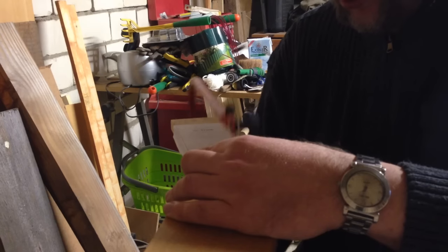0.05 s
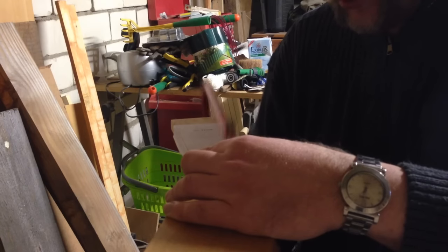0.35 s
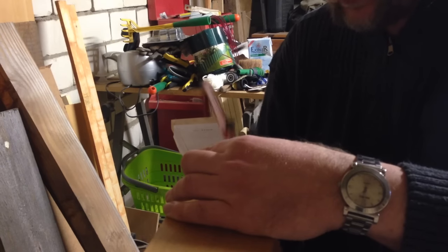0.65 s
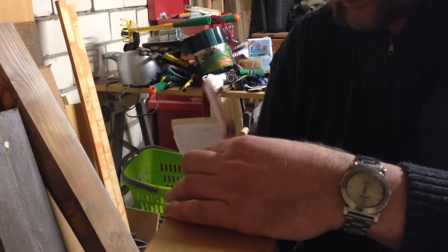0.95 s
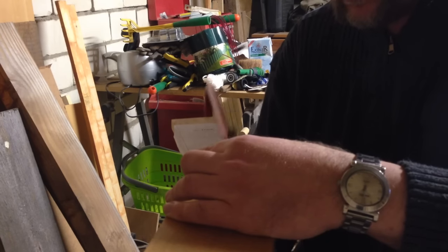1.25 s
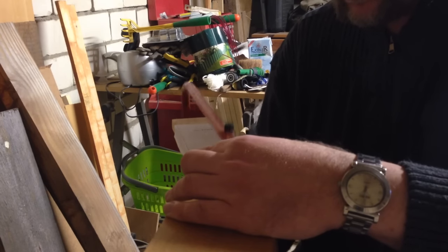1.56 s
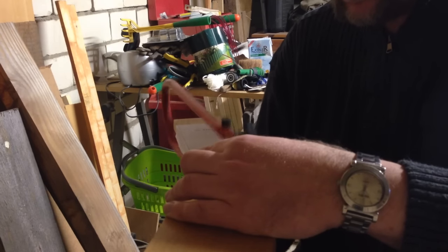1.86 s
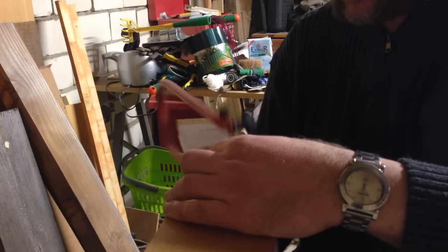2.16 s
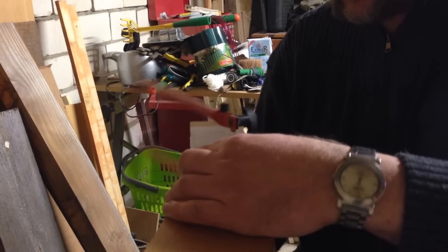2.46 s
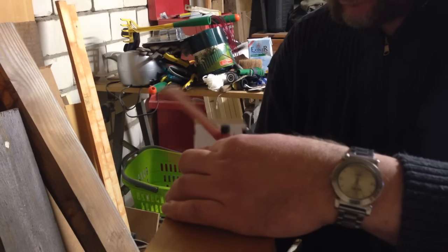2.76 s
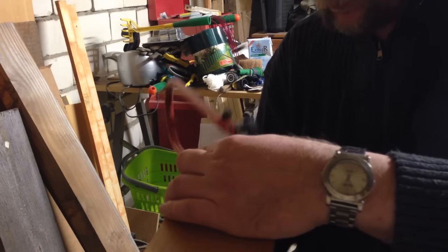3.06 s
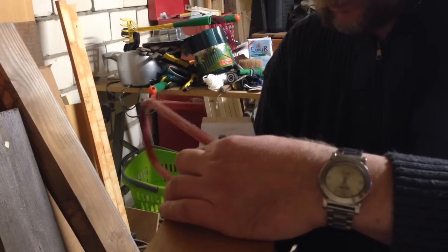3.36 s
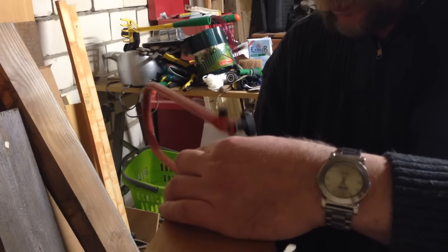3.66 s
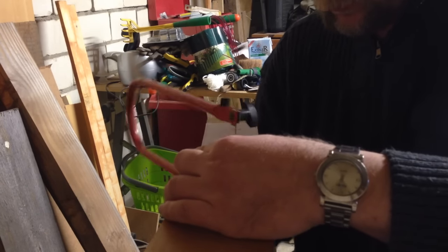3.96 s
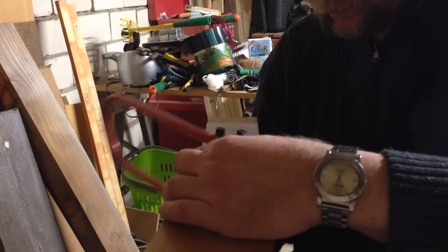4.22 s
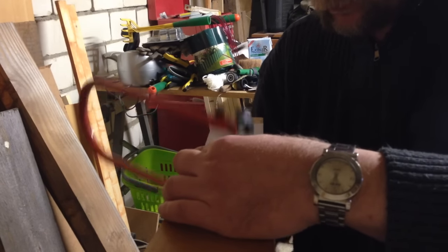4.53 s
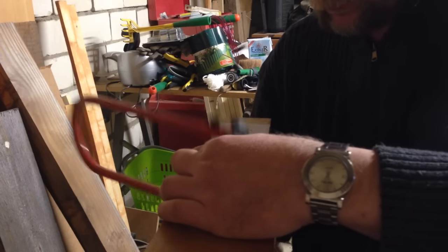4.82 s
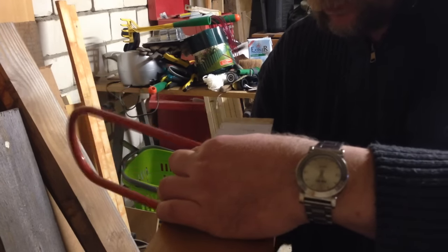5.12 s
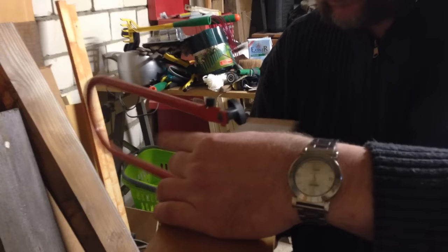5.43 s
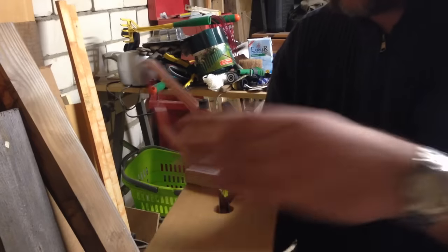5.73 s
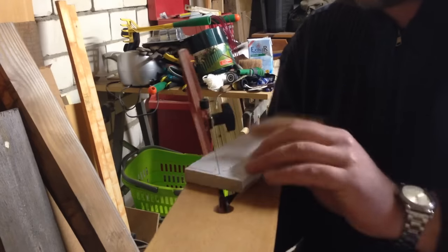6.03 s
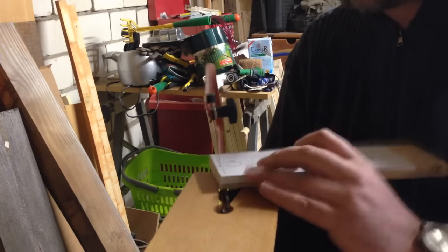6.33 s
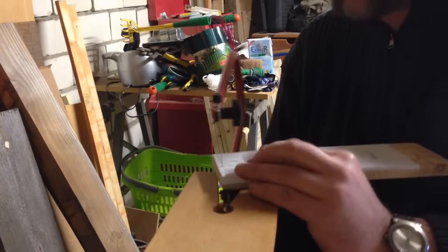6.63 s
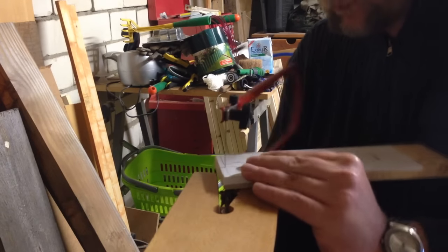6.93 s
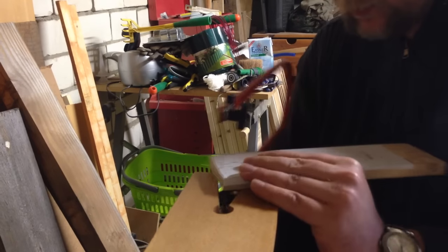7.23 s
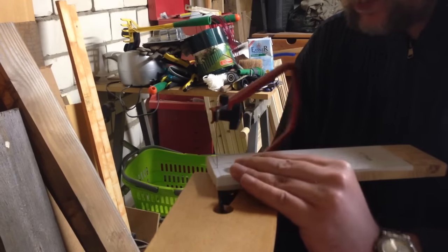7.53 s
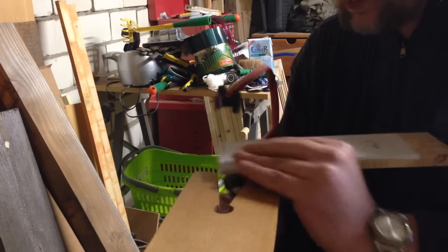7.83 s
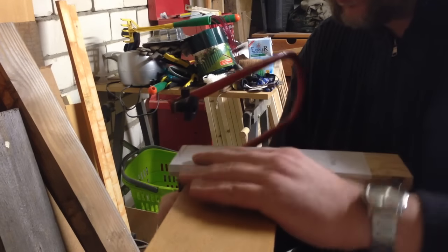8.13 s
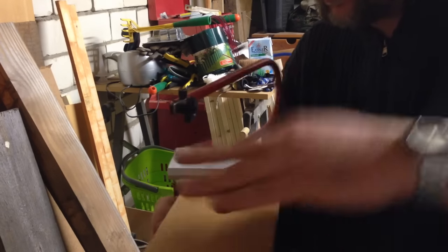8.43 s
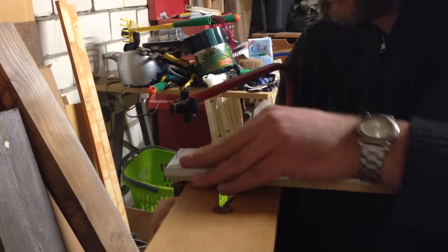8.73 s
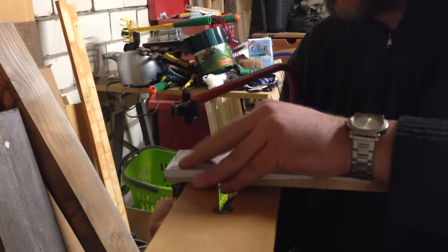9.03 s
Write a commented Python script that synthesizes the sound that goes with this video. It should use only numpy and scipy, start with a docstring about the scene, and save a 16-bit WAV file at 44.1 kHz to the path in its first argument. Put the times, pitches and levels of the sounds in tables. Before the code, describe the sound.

A hand fretsaw rasps quickly through a thin board, breaks through with a sharp crack, then the wood is knocked and slid about.

```python
"""Fretsaw cutting a thin board.

A hand fretsaw works on a sawing table in a small workshop; its teeth tear fibres and the board resonates.
Loud cutting strokes alternate with softer returns; now and then the blade snags and jolts the board.
The saw breaks through with a sharp knock; the board is lifted, set down and slid to a new position."""
import sys
import numpy as np
from scipy import signal
from scipy.fft import rfft, irfft, next_fast_len
from scipy.io import wavfile

SR = 44100
rng = np.random.default_rng(int(sys.argv[2]) if len(sys.argv) > 2 else 0)


def wav_out(sig):
    """Save sig, one row per channel (or a flat mono array), as 16-bit PCM at SR to the path in sys.argv[1]."""
    wavfile.write(sys.argv[1], SR, np.round(np.clip(np.atleast_2d(sig).T, -1, 1) * 32767).astype(np.int16))


N = 409233
TIME = np.arange(N) / SR
TABLE_HZ = 165   # lowest mode of the sawing table


def from_db(db):
    """Decibels to gain."""
    return 10 ** (np.asarray(db) / 20)


def unit_rms(x):
    """Scale to unit rms."""
    return x / np.sqrt(np.mean(x ** 2) + 1e-20)


def at_hz(points, hz):
    """Read a table on a log-frequency axis."""
    f, value = np.transpose(points)
    return np.interp(np.log(np.maximum(hz, 1)), np.log(f), value)


def at_time(curve, s):
    """Read every column of a curve at time s."""
    times, *columns = np.transpose(curve)
    return [np.interp(s, times, column) for column in columns]


def drift(rate_hz):
    """Smooth random curve, unit rms."""
    knots = rng.standard_normal(8000)
    return unit_rms(np.interp(TIME * rate_hz, np.arange(len(knots)), knots))


def body(colour, resonances=(), size=8192):
    """Minimum-phase response, peak 1; resonances: (centre [Hz], width [Hz], boost [dB])."""
    hz = np.fft.rfftfreq(size, 1 / SR)
    db = at_hz(colour, hz)
    for centre_hz, width_hz, boost_db in resonances:
        db = db + boost_db / (1 + (2 * (hz - centre_hz) / width_hz) ** 2)
    cepstrum = irfft(np.log(from_db(db)))
    cepstrum[1:size // 2] *= 2
    cepstrum[size // 2 + 1:] = 0
    response = irfft(np.exp(rfft(cepstrum)))[:size // 2]
    return response / np.abs(response).max()


def through(force, response):
    """Pass a force through an impulse response."""
    return signal.oaconvolve(force, response)[:N]


def grains(per_s, spread_db):
    """Fibres tear or catch at random moments, with uneven strength."""
    sizes = from_db(spread_db * np.minimum(rng.exponential(1, N), 4.5))
    return (rng.random(N) < per_s / SR) * sizes * rng.choice([-1, 1], N)


def blows(times, levels_db, scatter=0, scatter_s=0.003):
    """One impulse per contact, plus random echoes from the edges of the wood."""
    force = np.zeros(N + SR)
    t = TIME[:SR // 30]
    for s, db in zip(times, levels_db):
        echoes = rng.standard_normal(len(t)) * np.exp(-t / scatter_s)
        pulse = scatter * echoes / np.sqrt(np.sum(echoes ** 2))
        pulse[0] += 1
        at = round(s * SR)
        force[at:at + len(t)] += from_db(db) * pulse
    return force[:N]


def contact(s, db, response, scatter, scatter_s):
    """A single contact on a spot with this response."""
    at = round(s * SR)
    force = blows([s], [db], scatter, scatter_s)[at:at + SR // 30]
    return np.pad(signal.fftconvolve(force, response), (at, N))[:N]


def bending(x, delay_at_1khz_s):
    """Dispersive bending waves in the board: lows arrive after highs."""
    size = next_fast_len(N + SR // 2)
    hz = np.fft.rfftfreq(size, 1 / SR)
    lag_cycles = 2 * delay_at_1khz_s * np.sqrt(1000 * hz)
    return irfft(rfft(x, size) * np.exp(-2j * np.pi * lag_cycles), size)[:N]


# workshop background: (frequency [Hz], level [dB])
AIR_COLOUR = [(20, -29), (40, 4), (55, -3.5), (90, -7), (130, -8), (185, 6.5), (245, -9.5), (310, -2.5),
              (600, -14.5), (850, -18), (2500, -16), (3200, -15), (5300, -16), (15000, -19)]


def air(level_db=-61.5):
    """Steady, low background noise."""
    return from_db(level_db) * unit_rms(through(rng.standard_normal(N), body(AIR_COLOUR)))


# reflection strength: (frequency [Hz], level [dB])
ROOM_COLOUR = [(150, 6), (700, 3), (1400, -1), (2600, -18.5), (6000, 2)]
# reverberation: (frequency [Hz], t60 [s])
ROOM_T60 = [(100, 0.22), (300, 0.18), (1000, .25), (2500, 0.21), (6000, 0.14), (14000, .12)]


def room_response(build_s=0.0026):
    """Diffuse reflections of a cluttered room: fast build-up, treble dies first; unit energy."""
    t = TIME[:SR // 2]
    edges_hz = np.geomspace(45, 17000, 10)
    tail = 0
    for low, high in zip(edges_hz, edges_hz[1:]):
        bandpass = signal.butter(2, [low, high], "band", fs=SR, output="sos")
        band = signal.sosfilt(bandpass, rng.standard_normal(len(t)))
        hz = np.sqrt(low * high)
        tail += band * from_db(at_hz(ROOM_COLOUR, hz) - 60 * t / at_hz(ROOM_T60, hz))
    tail *= (1 - np.exp(-t / build_s)) ** 2
    return tail / np.sqrt(np.sum(tail ** 2))


# hand and board sliding on the table: (time [s], hum [dB], rub [dB])
SLIDE = [(5.6, -82, -57.5), (6.21, -72, -78), (6.48, -52, -59), (6.64, -57, -65), (6.92, -64.5, -72.5),
         (7.93, -69.5, -58.5), (8.2, -57, -72), (8.5, -65.5, -67.5), (9.28, -72, -71)]
# short rubs: a brief scrape of the returning blade at 2.43 s, then rubs of hand, sleeve and board: (middle [s],
# length [s], level [dB])
RUBS = [(2.428, .06, -57), (5.828, 0.12, -60.5), (5.923, 0.12, -56), (6.235, 0.22, -58.5),
        (6.592, 0.048, -57.5), (6.878, 0.11, -60.5), (7.401, 0.16, -57), (7.552, 0.23, -60.5),
        (7.887, 0.13, -56), (8.08, .17, -55.5), (8.202, 0.13, -51.5), (8.365, 0.5, -60), (8.54, 0.056, -56),
        (8.77, 0.21, -60), (9.028, 0.14, -60.5)]
# friction spectrum: (frequency [Hz], level [dB])
RUB_COLOUR = [(200, -30.5), (400, -4.5), (900, -8), (1500, -4), (2500, -3), (4000, -10), (5400, -11),
              (8000, -22.5), (15000, -19.5)]


def sliding(hum_gain_db=-1, rub_gain_db=-4, resting_hum_db=-74, resting_rub_db=-78):
    """Friction of hand and board rustles and keeps the table's lowest mode humming."""
    times, hum_db, rub_db = np.transpose(SLIDE)
    hum_colour = [(40, -27), (120, -10.5), (175, -9), (240, -7), (330, -22), (700, -32), (3000, -64.5)]
    hum = unit_rms(through(grains(900, 7.5), body(hum_colour, [(TABLE_HZ, 24, 17)])))
    hum *= from_db(np.interp(TIME, times, hum_db + hum_gain_db, left=resting_hum_db))
    friction = grains(3000, 3.6) * from_db(2 * drift(50))
    rub = unit_rms(through(friction, body(RUB_COLOUR)))
    pressure = from_db(np.interp(TIME, times, rub_db + rub_gain_db, left=resting_rub_db))
    for middle_s, length_s, db in RUBS:
        arch = np.cos(np.pi * np.clip((TIME - middle_s) / length_s, -0.5, 0.5))
        pressure = np.maximum(pressure, from_db(db) * arch)
    return hum + rub * pressure


# swish spectrum: (frequency [Hz], level [dB])
SWISH_COLOUR = [(500, -5.5), (2000, 4), (4000, 0.5), (5500, 6.5), (9000, -4), (15000, -6)]


def swish(peak_s=7.165, level_db=-46, rise_db_per_s=1700, fall_db_per_s=272):
    """A bright swish that rises fast and dies away."""
    t = TIME - peak_s
    envelope_db = level_db + np.minimum(rise_db_per_s * t, -fall_db_per_s * t)
    hiss = unit_rms(through(grains(11000, 2.1), body(SWISH_COLOUR)))
    return from_db(np.maximum(envelope_db, -200)) * hiss


# one brief rub, two saw frame taps: (time [s], level [dB], ring [Hz])
LIGHT_CONTACTS = [(8.535, -41, 1300), (8.875, -33.5, 3180), (9.264, -32.5, 5400)]
# their spectrum: (frequency [Hz], level [dB])
LIGHT_COLOUR = [(200, -15), (700, -7), (1300, -5), (1850, 0), (2500, -7.5), (3300, -4.5), (4400, -15),
                (5400, -9), (7000, -17.5), (14000, -30)]


def light_contacts():
    """A brief rub near 1.3 kHz, then two light taps of the saw frame."""
    return sum(contact(s, db, body(LIGHT_COLOUR, [(hz, 0.27 * hz, 11)]), scatter=3.54, scatter_s=0.018)
               for s, db, hz in LIGHT_CONTACTS)


# sawing table modes: (frequency [Hz], level [dB], t60 [s])
TABLE_MODES = [(178, 1.5, 0.17), (306, -1, 0.39), (590, -5, 0.34), (900, -12, .24), (1004, -3, 0.39),
               (1160, 7, .3), (1297, 7, 0.18), (1536, 12, 0.24), (1777, -3.5, 0.13), (1820, -18, .22),
               (2300, -21, .22), (3020, -7, .16)]


def table_ring(force):
    """The table's modes ring on after a blow."""
    t = TIME[:SR // 2]
    modes = sum((-1) ** k * from_db(db - 60 * t / t60_s) * np.sin(2 * np.pi * hz * t)
                for k, (hz, db, t60_s) in enumerate(TABLE_MODES))
    return through(force, modes)


# board hitting the table: (time [s], clack [dB], thud [dB], ring [Hz])
BUMPS = [(2.5, -55, -54, 400), (2.635, -39.5, -42.5, 600), (5.747, -39, -50.5, 2270),
         (6.162, -35, -47.5, 2520), (6.291, -32.5, -30, 603), (6.452, -53, -36, 400),
         (6.463, -16, -25, 2440), (6.49, -32, -30, 590), (6.666, -53, -49.5, 420),
         (6.729, -48, -53.5, 2180), (7.083, -43.5, -36.5, 400), (7.347, -46, -47, 2200),
         (8.004, -33.5, -31.5, 332), (8.159, -40, -32.5, 420), (8.2031, -17.5, -28, 1230),
         (8.346, -32.5, -37, 2680), (8.736, -59, -47.5, 300)]
# clack spectrum: (frequency [Hz], level [dB])
CLACK_COLOUR = [(100, -20), (300, -20), (600, -4.5), (900, 9.5), (1250, 10), (1800, 11.5), (2400, 11),
                (3200, -3.5), (4200, -7), (5400, -18), (7000, -25), (14000, -34)]
# thud spectrum: (frequency [Hz], level [dB])
THUD_COLOUR = [(30, -12), (60, -3), (110, -5.5), (165, 6), (255, -8.5), (320, 3.5), (410, -1.5),
               (560, -9.5), (800, -20.5), (2500, -65)]


def bumps(rock_s=0.04, clack_loss_db=18.5, thud_loss_db=9.5, ring_db=-42, hum_db=-23, hum_t60_s=1.2):
    """The board lands, rocks and touches again softly; the table thuds, rings and hums."""
    touches = [(s + k * rock_s, clack_db - k * clack_loss_db, thud_db - k * thud_loss_db, hz)
               for s, clack_db, thud_db, hz in BUMPS for k in range(2)]
    resonances = [(2000, 200, 3), (2850, 350, 8), (3550, 250, 4), (5350, 500, 7)]
    clacks = np.zeros(N)
    for s, db, _, hz in touches:
        spot = body(CLACK_COLOUR, [(hz, 0.21 * hz, 9)] + resonances)
        clacks += contact(s, db, spot, scatter=1, scatter_s=0.0086)
    times, clack_db, thud_db, _ = np.transpose(touches)
    ring = from_db(ring_db) * table_ring(blows(times, clack_db))
    thud_force = blows(times, thud_db, scatter=0.97, scatter_s=0.0059)
    thuds = through(thud_force, body(THUD_COLOUR, [(TABLE_HZ, 40, 4), (590, 120, 6)]))
    t = TIME[:SR]
    lowest_mode = from_db(hum_db - 60 * t / hum_t60_s) * np.sin(2 * np.pi * TABLE_HZ * t)
    hum = through(blows(times, thud_db), lowest_mode)
    return clacks + ring + thuds + hum


# breakthrough and rebound: (time [s], level [dB])
BREAK = [(5.4491, 0), (5.4835, -17.5)]
# crack spectrum: (frequency [Hz], level [dB])
CRACK_COLOUR = [(60, -15.5), (150, -11.5), (300, -3), (600, -1), (1000, -1), (1600, -8.5), (2000, -6.5),
                (2400, -4), (2900, -9.5), (3500, -9.5), (4300, -14.5), (5400, -15), (6500, -34),
                (12000, -46)]
# struck board and saw frame: (centre [Hz], width [Hz], boost [dB])
CRACK_RESONANCES = [(1775, 140, 12.5), (2210, 240, 8), (2520, 230, 10), (2950, 126, 14), (3340, 340, 6.5),
                    (5370, 380, 5)]


def breakthrough(ring_db=-48):
    """The saw breaks through with a short crack and rebounds; the table rings on."""
    force = blows(*np.transpose(BREAK), scatter=0.73, scatter_s=0.003)
    crack = through(force, body(CRACK_COLOUR, CRACK_RESONANCES + [(2550, 790, 3.6)]))
    return crack + from_db(ring_db) * table_ring(force)


# blade snags: (time [s], click [dB], flutter [dB], flutter length [s])
SNAGS = [(.745, -38, -38, 0.027), (.978, -25, -31.5, .024), (1.031, -31, -36, 0.012),
         (1.39, -41, -39, 0.014), (1.537, -26, -30, 0.023), (4.079, -33.5, -41.5, 0.026),
         (4.515, -23.5, -34, 0.0182), (5.005, -55, -40.5, 0.022), (5.197, -45, -38.5, 0.044)]


def snags(flutter_hz=326, sag=0.11, overtone_db=-9, attack_s=0.0011, release_s=0.00048):
    """A tooth catches with a click; the board flutters, sinking in pitch, until pressed down again."""
    times, click_db = np.transpose(SNAGS)[:2]
    force = blows(times, click_db, scatter=1, scatter_s=0.0059)
    out = through(force, body(CLACK_COLOUR, [(2260, 200, 10), (3240, 440, 11), (5240, 950, 23.3)]))
    t = TIME[:SR // 10]
    for start_s, _, flutter_db, length_s in SNAGS:
        phase = 2 * np.pi * flutter_hz * t * (1 + sag * (1 - t / length_s))
        flutter = np.sin(phase) + from_db(overtone_db) * np.sin(1.8 * phase)
        envelope = (1 - np.exp(-t / attack_s)) * (1 - np.tanh((t - length_s) / release_s)) / 2
        at = int(start_s * SR)
        out[at:at + len(t)] += from_db(flutter_db) * envelope * flutter
    return out


# grip on the board and lean of the blade: (time [s], looseness [dB], screech [dB])
GRIP = [(0, -2, 1.5), (1.0, 2.5, .5), (1.8, -2, 0.5), (2.3, -4.5, -2.5), (2.9, -3.5, 3), (3.45, -1.5, 7),
        (4.25, 5.5, 2.5), (4.7, 3, 1), (5.3, -5.5, 1)]
# boom of the board: (frequency [Hz], level [dB])
BOOM_COLOUR = [(35, -2), (60, -14.5), (90, -1), (130, -11), (175, -5), (235, -10), (328, 2), (420, 2),
               (600, -19.5), (1500, -69)]
# board and blade while sawing: (centre [Hz], width [Hz], boost [dB])
SAW_RESONANCES = [(607, 27, 6), (861, 120, 6.5), (1117, 34, 9), (1438, 28, 8.5), (1731, 54, 5.5),
                  (2050, 53, 7.5), (2510, 54, 3), (5340, 167, 7.5)]


def strokes(table, colour, blade_ring, *, swell, fastest_share, skid_db, skid_share, teeth_hz,
            tooth_depth, fibres_per_s, spread_db, rasp_db, treble_db, boom_db,
            uneven_db=1, wander=0.018, screech_hz=2500, dulling_db_per_db=0.88):
    """The blade speeds up and slows in each stroke; every passing tooth tears a burst of fibres."""
    out = np.zeros(N + SR)
    break_s = BREAK[0][0]
    fibres = unit_rms(grains(fibres_per_s, spread_db) * from_db(uneven_db * drift(110)))
    unsteady = 1 + 0.1222 * drift(90)
    for middle_s, length_s, level_db in table:
        start_s, end_s = middle_s - length_s / 2, middle_s + length_s / 2
        span = slice(max(int(start_s * SR), 0), int(min(end_s, break_s) * SR))
        progress = (TIME[span] - start_s) / length_s
        speed = np.abs(np.sin(np.interp(progress, [0, fastest_share, 1], [0, np.pi / 2, np.pi])))
        teeth_passed = np.cumsum(teeth_hz * speed * unsteady[span]) / SR
        bite = unit_rms(np.exp(tooth_depth * np.cos(2 * np.pi * teeth_passed)))
        skidding = progress < skid_share   # before the teeth dig in
        force = from_db(level_db + skid_db * skidding) * speed ** swell * bite * fibres[span]
        # the resonances wander slightly at random from stroke to stroke
        shifted = [(hz * (1 + wander * rng.standard_normal()), width_hz, db)
                   for hz, width_hz, db in SAW_RESONANCES + blade_ring]
        plate_modes = [(hz, 70, 3) for hz in rng.uniform(700, 2800, size=6)]
        loose_db, screech_db = at_time(GRIP, middle_s)
        screech = (screech_hz, 600, screech_db)
        treble = (6500, 7000, treble_db - dulling_db_per_db * loose_db)
        rasp = body(colour, shifted + plate_modes + [screech, treble])
        # a deeper kerf lets the board flap and shake the table harder
        depth = middle_s / break_s
        boom_modes = [(90, 35, 3), (TABLE_HZ, 30, 6 * depth), (270, 110, 9 * depth), (322, 35, 5)]
        boom = body(BOOM_COLOUR, boom_modes)
        for db, response in ((rasp_db, rasp), (boom_db + loose_db, boom)):
            sound = signal.fftconvolve(force, response / np.sqrt(np.sum(response ** 2)))
            out[span.start:span.start + len(sound)] += from_db(db) * sound
    return out[:N]


# return strokes: (middle [s], length [s], level [dB])
RETURNS = [(.085, 0.32, -45), (.345, 0.2, -45.5), (.645, 0.16, -44.5), (.933, .16, -44), (1.215, 0.16, -45),
           (1.505, 0.15, -42), (1.765, 0.18, -47), (2.03, 0.17, -50.5), (2.29, 0.18, -49.5),
           (2.875, .14, -51.5), (3.225, 0.2, -48), (3.625, 0.25, -46.5), (4.005, 0.22, -45),
           (4.505, 0.2, -46), (4.985, 0.17, -45.5), (5.4, 0.33, -47.5)]
# rasp of sliding teeth: (frequency [Hz], level [dB])
RETURN_COLOUR = [(260, -7), (450, -4.5), (846, 0), (994, -5), (1100, 0), (1200, -1), (2470, -3),
                 (3170, -6.5), (3460, -3), (4010, -11.5), (5370, -14), (6690, -19), (15000, -26.5)]
# taut blade: (centre [Hz], width [Hz], boost [dB])
BLADE_RING = [(3520, 130, 8.5)]


def return_strokes():
    """The teeth slide back softly and the taut blade sings."""
    return strokes(RETURNS, RETURN_COLOUR, BLADE_RING,
                   swell=1.29, fastest_share=0.55, skid_db=2, skid_share=0.127,
                   teeth_hz=590.5, tooth_depth=0.32, fibres_per_s=13000, spread_db=2,
                   rasp_db=0, treble_db=4.5, boom_db=-10)


# cutting strokes: (middle [s], length [s], level [dB])
CUTS = [(.219, 0.18, -38.5), (.505, 0.2, -36), (.792, .2, -36), (1.078, 0.19, -34), (1.361, .19, -35),
        (1.628, 0.18, -40.5), (1.903, 0.21, -42), (2.159, .15, -42), (2.71, 0.27, -49), (3.435, 0.18, -33),
        (3.856, 0.16, -32.5), (4.278, 0.21, -35), (4.713, 0.22, -34), (5.205, 0.17, -34.5)]
# rasp of cutting teeth: (frequency [Hz], level [dB])
CUT_COLOUR = [(260, -54.5), (450, -7.5), (545, -4), (603, -4), (774, -4), (846, -1), (1200, -6),
              (2430, 0.5), (3080, -12), (3560, -4.5), (4500, -14), (5140, -10), (6690, -20), (9110, -21.5),
              (15000, -36)]


def cutting_strokes():
    """The teeth skid, then dig in all at once; the blade rings only faintly."""
    blade_hz = BLADE_RING[0][0]
    return strokes(CUTS, CUT_COLOUR, [(blade_hz, 160, 3)],
                   swell=2.18, fastest_share=0.48, skid_db=-5, skid_share=0.22,
                   teeth_hz=750, tooth_depth=0.27, fibres_per_s=12000, spread_db=1.33,
                   rasp_db=-0.5, treble_db=0.8, boom_db=-11)


def scene():
    """Saw and board close by, the workshop around them; mono."""
    saw = cutting_strokes() + return_strokes() + snags()
    knocks = bending(breakthrough() + bumps() + light_contacts(), delay_at_1khz_s=0.001223)
    reflections = through(from_db(-11) * saw + from_db(-5.5) * knocks, room_response())
    return (air() + reflections + sliding() + swish() + knocks + saw)[None]


def record(dry, low_cut_hz=36, high_cut_hz=15400):
    """Microphone band: gentle low cut, steep high cut."""
    dry = signal.sosfilt(signal.butter(2, low_cut_hz, "high", fs=SR, output="sos"), dry)
    return signal.sosfilt(signal.ellip(12, 0.1, 80, high_cut_hz, fs=SR, output="sos"), dry)


dry = scene()
out = record(dry)
wav_out(out)
```